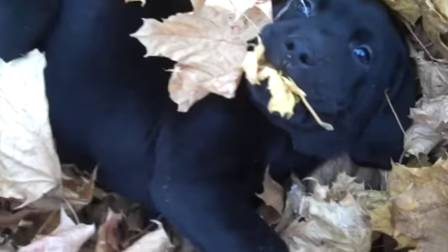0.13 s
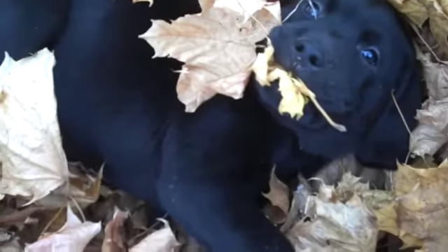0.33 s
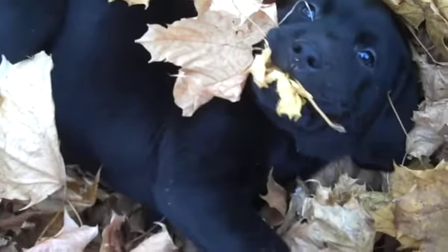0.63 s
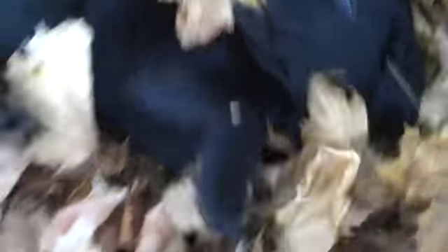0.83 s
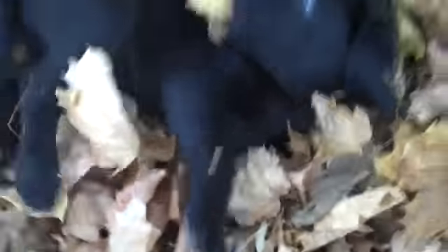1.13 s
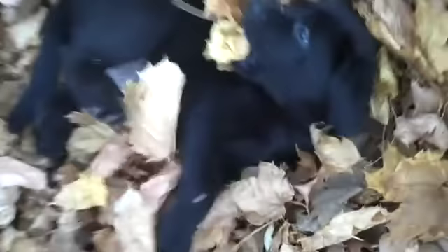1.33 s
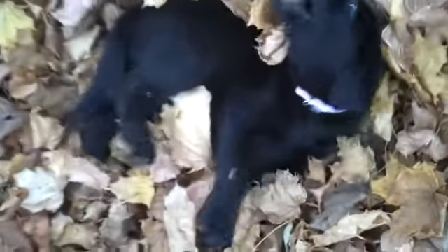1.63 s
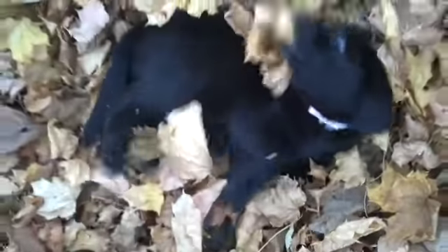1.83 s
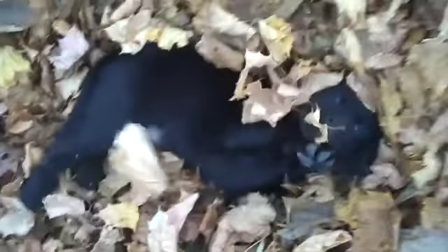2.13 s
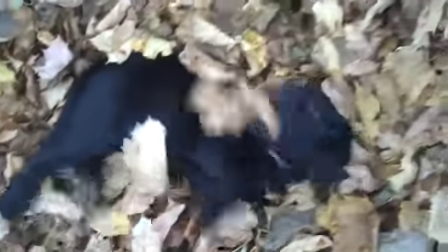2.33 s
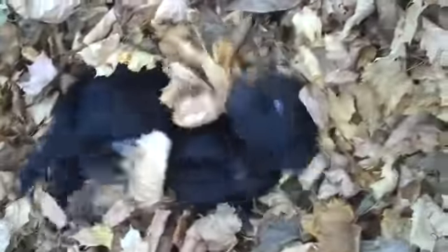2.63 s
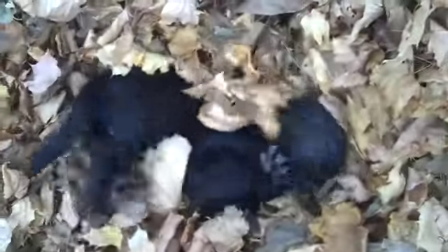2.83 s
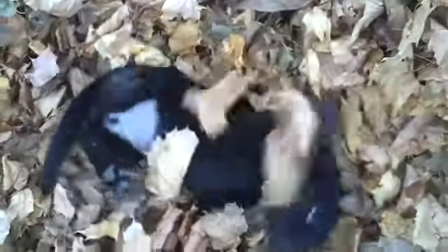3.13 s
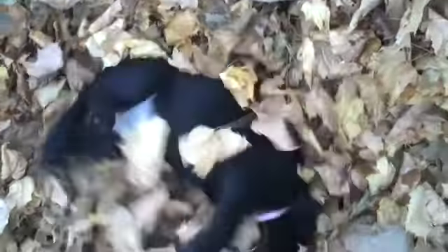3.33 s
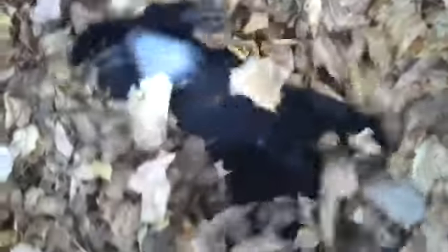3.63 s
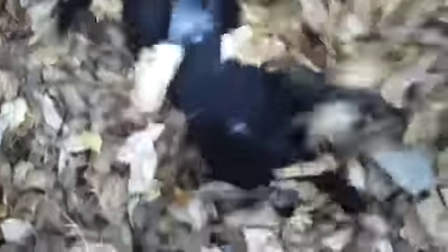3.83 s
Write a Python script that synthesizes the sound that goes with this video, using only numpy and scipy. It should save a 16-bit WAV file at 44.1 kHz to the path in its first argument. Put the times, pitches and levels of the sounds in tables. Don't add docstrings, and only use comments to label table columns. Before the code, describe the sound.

Dry leaves tick faintly while a puppy lies still, then rustle and crackle densely as it rolls, with sharp snaps on top, in a quiet yard, close to a small camera microphone.

```python
import sys
import numpy as np
from scipy import signal
from scipy.fft import rfft, irfft
from scipy.io import wavfile
from scipy.ndimage import uniform_filter1d

SR = 44100
rng = np.random.default_rng(int(sys.argv[2]) if len(sys.argv) > 2 else 0)


def voltage_ratio(decibels):
    exponent = np.asarray(decibels, float) / 20
    return 10 ** exponent


def dump_mix(stems):
    frames = np.atleast_2d(stems).T
    limited = np.clip(frames, -1, 1)
    pcm = np.round(limited * 32767).astype(np.int16)
    wavfile.write(sys.argv[1], SR, pcm)


N = 176400
T = np.arange(N) / SR


def evened(x):
    return x / np.sqrt(np.mean(x ** 2) + 1e-20)


def read(points, hz):
    f, db = np.transpose(points)
    return np.interp(np.log(hz + 1), np.log(f + 1), db)


def follow(points):
    return np.interp(T, *np.transpose(points))


def colour(x, points):
    gain = voltage_ratio(read(points, np.fft.rfftfreq(N, 1 / SR)))
    return irfft(rfft(x) * gain, N)


def leak(x, s):
    return signal.lfilter([1], [1, -np.exp(-1 / (s * SR))], x)


def slow(top_hz):
    rates = np.geomspace(top_hz / 12, top_hz, 24)
    return evened(sum(np.sin(2 * np.pi * (f * T + rng.random())) / np.sqrt(f) for f in rates))


def crack(hz, t60, spread, noise, front=5.44):
    t = np.arange(len(noise)) / SR
    low, high = hz / (1 + spread), min(hz * (1 + spread), 9000)
    burst = (noise + front * (t == 0)) * voltage_ratio(-60 * t / t60)
    x = signal.lfilter(*signal.butter(2, [low, high], "band", fs=SR), burst)
    return x / abs(x).max()


def crackle(rate, size_db, t60, spread):
    kinds = 24
    hit = rng.random(N) < rate / SR
    kind = rng.integers(0, kinds, N)
    size = hit * voltage_ratio(size_db * np.minimum(rng.exponential(1, N), 4.5)) / np.sqrt(rate)
    total, power = 0, 0
    for k, hz in enumerate(np.geomspace(300, 8000, kinds)):
        ring_s = t60 * (3000 / hz) ** 0.24
        shape = rfft(crack(hz, ring_s, spread, rng.standard_normal(1500)), N)
        total = total + rfft(size * (kind == k)) * shape
        power = power + abs(shape) ** 2
    return irfft(total / np.sqrt(uniform_filter1d(power, size=1500) + 1e-9), N)


def patchy(x):
    z = signal.stft(x, nperseg=256)[2]
    patches = uniform_filter1d(rng.standard_normal(z.shape), size=7, axis=0)
    patches = uniform_filter1d(patches, size=14, axis=1)
    return signal.istft(z * voltage_ratio(0.8 * evened(patches)), nperseg=256)[1][:N]


# (t/s, effort level/dB)
STIRS = [
    (.075, -58),
    (.1, -68),
    (.13, -72),
    (.16, -54),
    (.25, -63.5),
    (.3, -60),
    (.335, -73),
    (.36, -55),
    (.4, -66.5),
]
# (t/s, effort level/dB)
MOVES = [
    [(.47, -65), (.6, -61.5), (.63, -50.5), (.642, -39), (.648, -44.5), (.657, -38), (.668, -32.5),
     (.7, -36), (.73, -33), (.8, -36.5), (.85, -41)],
    [(.868, -37.5), (.89, -40), (.93, -42), (1.0, -46.5), (1.05, -46.5), (1.09, -43.5), (1.18, -45)],
    [(1.21, -41), (1.265, -36.5), (1.3, -39.5), (1.39, -47), (1.47, -44.5), (1.5, -38.5), (1.57, -38),
     (1.61, -41)],
    [(1.64, -39.5), (1.665, -42), (1.69, -38.5), (1.72, -41), (1.745, -38), (1.782, -44), (1.795, -40.5),
     (1.86, -43.5), (1.89, -39.5), (2.04, -38.5), (2.12, -41), (2.17, -44.5), (2.195, -48)],
    [(2.24, -48.5), (2.255, -44.5), (2.28, -41.5), (2.3, -39.5), (2.32, -40), (2.338, -38), (2.38, -39),
     (2.5, -41), (2.62, -43), (2.83, -41), (3.03, -38), (3.11, -38.5)],
    [(3.135, -36.5), (3.16, -38), (3.175, -32.5), (3.21, -31.5), (3.225, -30.5), (3.27, -31.5),
     (3.3, -37.5), (3.335, -34), (3.357, -36.5), (3.38, -37.5), (3.42, -41)],
    [(3.47, -37), (3.505, -38), (3.52, -33), (3.55, -35.5), (3.62, -35), (3.75, -38.5), (3.84, -33),
     (3.9, -36.5), (4.0, -40.5)],
]
# (t/s, level/dB)
WEIGHT = [(0, 4.5), (.65, 4.5), (.74, -2), (.9, 0.5), (1.4, -3), (2, -2.5), (2.6, 0.5), (3.1, -3.5),
          (3.17, 0), (3.25, 5.5), (3.45, 3.5), (4, 1.5)]
# (f/Hz, level/dB per Hz)
LEAF = [(200, -31.5), (400, -44.5), (800, -13.5), (1500, -9.5), (2900, -1.5), (4500, -1), (7000, -2),
        (12000, -9.5)]
# (f/Hz, level/dB per Hz)
PILE = [(150, -28), (300, -15), (470, -7.5), (750, -14.5), (1050, -4), (1400, -3.5), (2800, 1), (4200, -6),
        (7000, -30)]
CRACKS_PER_S, STILL_PER_S, BUSY_DB = 6000, 900, -45
SPIKES_PER_S, SPIKE_DB = 2000, 0.5
PILE_DB, PILE_FOLLOW = -8.5, 0.67


def rustle():
    effort = follow(np.concatenate([STIRS] + MOVES))
    busy = np.minimum(voltage_ratio(effort - BUSY_DB), 2)
    rate = STILL_PER_S + CRACKS_PER_S * busy * voltage_ratio(2.0 * slow(40))
    top = evened(colour(crackle(rate, 1.5, 0.016, 0.47), LEAF))

    sheet = evened(colour(rng.standard_normal(N), LEAF)) * np.minimum(busy, 1)
    spikes = (rng.random(N) < SPIKES_PER_S / SR) * rng.standard_normal(N)
    sheet = sheet + voltage_ratio(SPIKE_DB) * evened(colour(spikes, LEAF))

    crush = evened(colour(crackle(rate * .4, 2.96, 0.017, 0.41), PILE))
    settled = PILE_FOLLOW * effort + (1 - PILE_FOLLOW) * uniform_filter1d(effort, size=9000)
    leaves = voltage_ratio(effort + 0.49 * slow(150)) * (voltage_ratio(-1.0) * top + voltage_ratio(-6) * sheet)
    return patchy(leaves + voltage_ratio(settled + PILE_DB + follow(WEIGHT)) * crush)


# (t/s, peak level/dB, ring f/Hz, t60/s)
TICKS = [(.0765, -45.5, 2540, .02), (.11, -47, 2570, 0.013), (.1184, -63, 1900, 0.019),
         (0.1376, -50, 3500, .008), (.1415, -38.5, 4300, 0.0089), (0.153, -34, 2760, 0.021),
         (.1545, -37, 6500, 0.011), (0.169, -44, 2610, 0.011), (0.1803, -40, 3070, 0.012),
         (.184, -52, 6500, .012), (.176, -42, 3500, .012), (.188, -48, 4500, .015),
         (0.2165, -40.5, 4970, 0.022), (.2245, -45, 4200, .015), (0.23, -48, 3300, 0.017),
         (.239, -46, 3500, .02), (.244, -43, 2500, 0.018), (.2785, -46, 3480, .015),
         (0.274, -45, 2470, 0.021), (0.3017, -48, 4000, 0.027), (0.345, -38, 5000, .008),
         (.3487, -30.5, 4030, 0.015), (.3608, -36, 4060, 0.0061), (0.3695, -41, 5500, 0.01),
         (0.3755, -38.5, 3280, .015), (0.406, -47, 4500, .02), (0.431, -49, 3030, 0.017),
         (0.49, -45, 4530, 0.011), (.502, -44, 3500, .008), (0.5062, -36.5, 4120, 0.022),
         (.5262, -43, 4000, .01), (.536, -49, 2000, 0.016), (0.5486, -48, 2280, .012),
         (0.575, -50, 1950, .012), (.589, -45, 1980, .015), (0.5923, -42, 5030, 0.02),
         (.613, -44, 4500, .015), (.621, -46, 2800, .012)]
# (t/s, peak level/dB, ring f/Hz, t60/s)
SNAPS = [(0.6493, -25, 2600, .015), (0.6673, -18.5, 4970, 0.044), (0.8685, -23, 4000, 0.02),
         (0.8716, -24, 2200, 0.006), (0.9752, -43, 3280, 0.012), (1.0163, -27, 4350, 0.0024),
         (1.0762, -27, 6000, 0.0043), (1.204, -35, 1410, 0.022), (1.2371, -23.5, 5190, 0.0087),
         (1.4355, -34, 1970, 0.021), (1.4603, -36, 1920, 0.015), (1.5646, -20.5, 4320, 0.008),
         (1.6, -27, 3970, 0.0066), (1.7035, -24.5, 4120, 0.006), (1.7913, -33, 2510, 0.01),
         (2.161, -28, 2660, 0.013), (2.2472, -26.5, 6160, .006), (2.4788, -26.5, 3690, 0.017),
         (2.853, -50, 4580, .008), (3.0944, -27, 4500, 0.006), (3.131, -25, 2570, 0.0061),
         (3.1659, -26.5, 2680, 0.032), (3.2217, -24, 3200, 0.0089), (3.2425, -20, 2400, 0.013),
         (3.262, -29.5, 1710, 0.029), (3.231, -27, 2600, .015), (3.2524, -23, 1800, 0.054),
         (3.334, -20, 4000, 0.0086), (3.4675, -27, 3190, 0.013), (3.5096, -26.5, 2570, 0.01)]
# (t/s, peak level/dB, ring f/Hz, t60/s)
PINGS = [(.9262, -20.5, 6240, 0.0094), (.931, -37, 1990, .012), (1.0162, -25, 4500, 0.012),
         (1.0762, -32, 4200, 0.0088), (1.237, -25, 5630, .012), (1.689, -33, 4100, .01),
         (2.336, -25.5, 4500, 0.013), (2.343, -34, 3500, 0.0084), (3.0944, -20, 3570, .012),
         (3.336, -23, 6500, .012), (3.536, -30, 3000, 0.012), (3.869, -22, 4500, .008),
         (.7, -30, 3400, .015), (.714, -27, 4000, .012), (.728, -24, 3100, .03), (.743, -27, 3300, 0.018),
         (.1535, -47.5, 1590, 0.018), (.348, -46, 1580, 0.02), (3.22, -22, 2700, .012)]
SNAP_SPREAD, PING_SPREAD, TICK_RISE_S = 0.57, 0.26, 0.00054


def snaps():
    out, t = np.zeros(N + 2000), np.arange(1500) / SR
    groups = (TICKS, SNAP_SPREAD, TICK_RISE_S), (SNAPS, SNAP_SPREAD, 0), (PINGS, PING_SPREAD, 0)
    for rows, spread, rise in groups:
        front = .5 if rise else 4.8
        for s, db, hz, t60 in rows:
            opening = 1 - np.exp(-(t + 1 / SR) / (rise + 1e-6))
            tear = rng.standard_normal(1500) * opening
            out[round(s * SR):][:1500] += voltage_ratio(db) * crack(hz, t60, spread, tear, front)
    return out[:N]


GLINT_DB, GLINT_FROM_HZ, GLINT_FULL_HZ = 2, 6700, 8100


def glinting(x):
    hz, _, z = signal.stft(x, SR, nperseg=256)
    share = np.clip((hz - GLINT_FROM_HZ) / (GLINT_FULL_HZ - GLINT_FROM_HZ), 0, 1)[:, None]
    flicker = voltage_ratio(GLINT_DB * share * rng.standard_normal(z.shape[1]))
    return signal.istft(z * flicker, nperseg=256)[1][:N]


# (t/s, length/s, push/0.001 of full scale)
KNOCKS = [
    (2.957, 0.013, 2.5),
    (3.093, 0.0017, -7.5),
]


def knocks():
    out = 0
    for s, length, push in KNOCKS:
        out = out + push / 1000 * np.sin(np.pi * np.clip((T - s) / length, 0, 1)) ** 2
    return out


# (t/s, hum level/dB)
HUM = [(.2, -83), (.34, -78), (.62, -78), (.7, -96), (1.06, -89), (1.13, -77.5), (1.25, -95), (1.38, -95),
       (1.45, -81.5), (1.8, -82), (1.9, -98), (2.2, -89), (2.35, -83), (2.9, -80), (3.15, -87), (3.3, -102),
       (3.6, -84), (4, -87)]


def motor_hum():
    hz = 124 * (1 + 0.012 * slow(12))
    return np.sin(2 * np.pi * np.cumsum(hz) / SR) * voltage_ratio(follow(HUM) + 2.5 * slow(12))


# (t/s, ramp/s, baseline jump/0.001 of full scale)
STEPS = [(0.665, 0.0028, -9), (0.676, 0.0063, -7.5), (0.726, 0.019, -2), (0.74, 0.0069, -5),
         (.775, 0.0037, -2), (.868, 0.0066, -5.5), (1.225, 0.0015, -2.5), (3.19, 0.0049, -2),
         (3.201, 0.034, -10), (3.226, 0.024, -4.5), (3.24, 0.036, -0.5), (3.334, 0.0073, -1.5),
         (3.799, 0.0045, -1.1)]


def steps():
    baseline = sum(jump * np.clip((T - s) / ramp, 0, 1) for s, ramp, jump in STEPS)
    return np.diff(baseline, prepend=0)


# (f/Hz, level/dB per Hz)
YARD = [(20, -11), (60, 0), (130, 1.5), (200, 1.5), (330, -0.5), (1000, 4.5), (4200, -9), (9000, -13)]
YARD_DB, DUCK_DB_PER_STEP, RECOVER_S = -65.5, 2.8, 0.36


def yard():
    wash = evened(colour(rng.standard_normal(N), YARD)) * voltage_ratio(YARD_DB + 1.0 * slow(2.0))
    return wash / voltage_ratio(DUCK_DB_PER_STEP * leak(-steps(), RECOVER_S))


def scene():
    leaves = glinting(rustle() + snaps())
    return (leaves + knocks() + yard() + motor_hum())[None]


# (f/Hz, level/dB)
MIC = [(480, 0), (640, 0), (800, 3), (7200, -1), (8050, -7), (8500, -16.5), (8950, -31.5), (9200, -130)]


def microphone(x):
    return colour(x, MIC)


START_S, START_RAMP_S, START_JUMP = 0.073, .00004, 20
SETTLE_S, OFFSET = 0.093, -0.42
# (f/Hz, level/dB per Hz)
WOBBLE = [(15, 4.5), (60, -4.5), (130, -14.5), (300, -10.5), (600, -68), (3000, -130)]
WOBBLE_DB, RUMBLE_DB = -21, -79.5


def jolted_baseline():
    jolt = leak(steps(), SETTLE_S) / 1000
    ripple = evened(colour(rng.standard_normal(N), WOBBLE)) * (voltage_ratio(WOBBLE_DB) * jolt + voltage_ratio(RUMBLE_DB))
    switch_on = START_JUMP * np.exp(-(T - START_S) / SETTLE_S)
    return jolt + ripple + (OFFSET + switch_on) / 1000


def top_cut(x):
    return signal.sosfilt(signal.butter(12, 16700, fs=SR, output="sos"), x)


def record(dry):
    on = np.clip((T - START_S) / START_RAMP_S, 0, 1)
    mix = (microphone(dry[0]) + jolted_baseline())[None] * on
    return top_cut(mix)


dry = scene()
out = record(dry)
dump_mix(out)
```